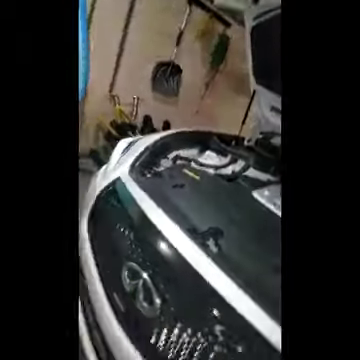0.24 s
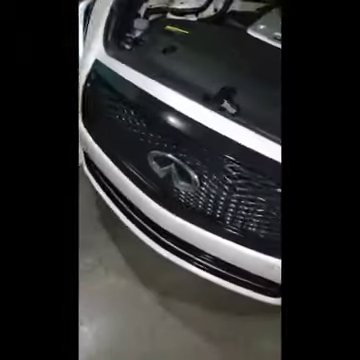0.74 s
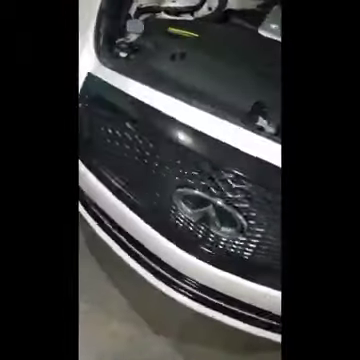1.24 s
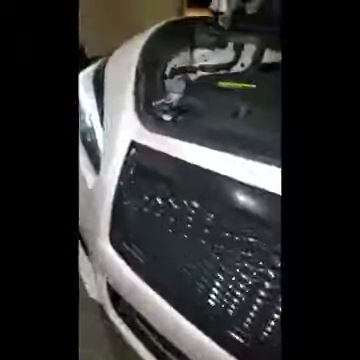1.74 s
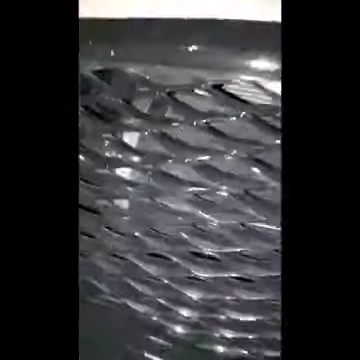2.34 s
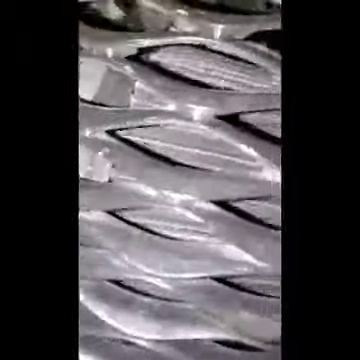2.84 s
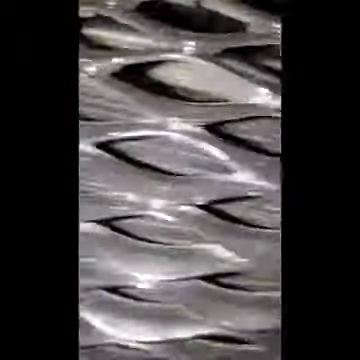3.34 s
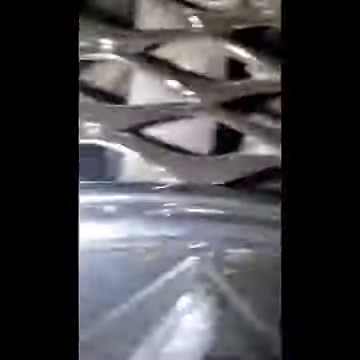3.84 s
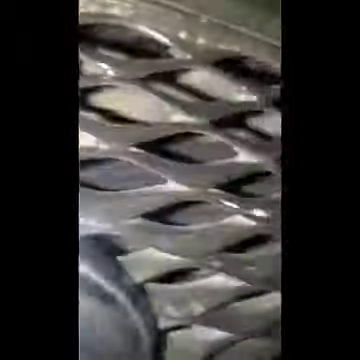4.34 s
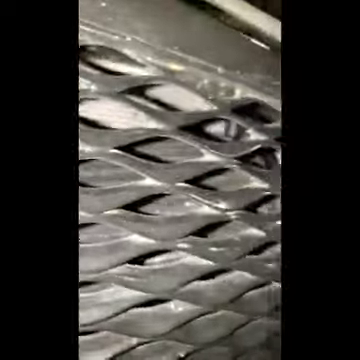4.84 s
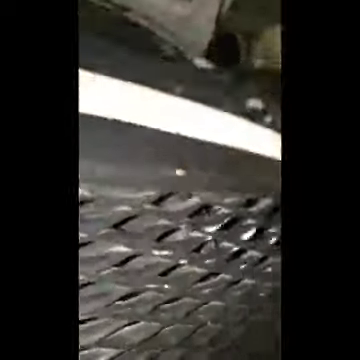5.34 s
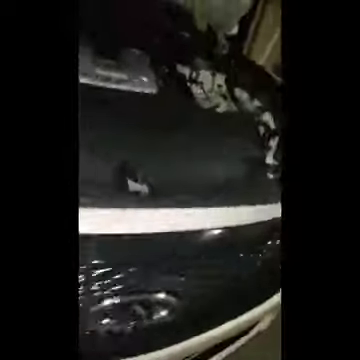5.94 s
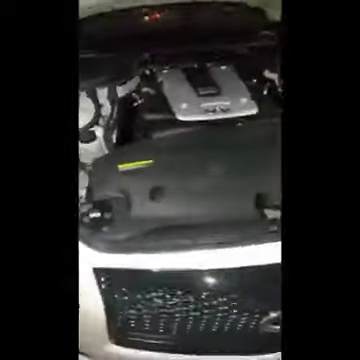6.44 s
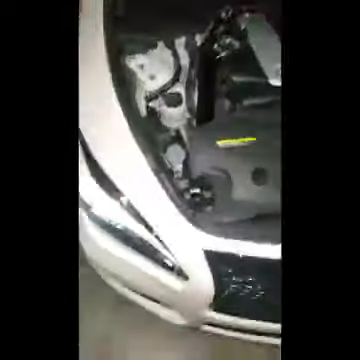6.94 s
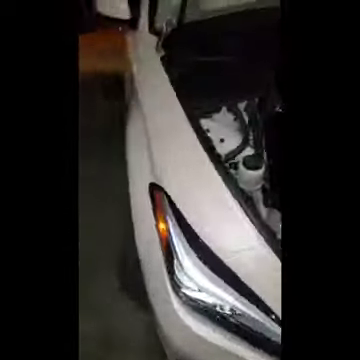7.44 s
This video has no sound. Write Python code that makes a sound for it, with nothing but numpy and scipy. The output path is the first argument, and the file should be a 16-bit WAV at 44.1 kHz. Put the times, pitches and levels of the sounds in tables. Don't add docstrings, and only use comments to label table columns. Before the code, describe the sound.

A six-cylinder engine idles fast in a closed garage for the whole 7.7 seconds, already running at the start and never revved. A deep boom around 100 hertz throbs between eight and nine times a second, beneath a broad roar of fan, belts and ticking valve gear. A high, thin alternator whine is clearest in the first second, then comes and goes. From about 1.2 to 2.4, low air thumps buffet the right side as the phone swings. A sleeve brushes around 1.8 to 2.1, and keys tinkle brightly at 2.1 to 2.3, with a tiny tick at 2.75. From 2 to 5.5, near the grille, the roar is brighter, with hollow ringing. At 5.85 to 6.05 keys clack harder with a soft cloth brush. The boom thins around 7, then swells back as the idle sags slightly.

```python
import sys
import numpy as np
from scipy import signal
from scipy.fft import rfft, irfft
from scipy.io import wavfile
from scipy.ndimage import uniform_filter1d

SR = 44100
rng = np.random.default_rng(int(sys.argv[2]) if len(sys.argv) > 2 else 0)


def attenuation_scalar(level_db):
    decades = np.asarray(level_db, float) / 20
    return 10 ** decades


def transcribe(u):
    v = np.clip(np.atleast_2d(u).T, -1, 1)
    q = np.round(v * 32767).astype(np.int16)
    wavfile.write(sys.argv[1], SR, q)


N = 339570
T = np.arange(N) / SR
FREQ = np.fft.rfftfreq(N, 1 / SR)


def columns(table):
    s, *values = np.transpose(table)
    return [np.interp(T, s, v) for v in values]


def at_hz(points, hz):
    f, v = np.transpose(points)
    return np.interp(np.log(np.maximum(hz, 1)), np.log(f), v)


def noise(gain, channels=2):
    white = rng.standard_normal((channels, N))
    return irfft(rfft(white) * gain * np.sqrt(SR / 2), N)


def walk(rate_hz):
    hold = int(SR / rate_hz)
    steps = np.repeat(rng.standard_normal(N // hold + 1), hold)[:N]
    return 1.54 * uniform_filter1d(uniform_filter1d(steps, hold), hold)


def ports(x, pan_db):
    return x * attenuation_scalar(np.array([pan_db / 2, -pan_db / 2]).reshape(2, -1))


def swells(rows, edge_db_per_s):
    gain = 0
    for start, end, db in rows:
        outside_s = np.clip(np.maximum(start - T, T - end), 0, None)
        gain = gain + attenuation_scalar(db - edge_db_per_s * outside_s)
    return gain


# t/s, rate/(cycles/s); a cycle is two crank turns, six firings
CYCLE_RATE = [(0.0, 8.678), (0.7, 8.577), (1.3, 8.694), (2.3, 8.683), (3.0, 8.619), (4.0, 8.624),
              (4.4, 8.538), (4.8, 8.6), (5.5, 8.698), (6.1, 8.617), (6.9, 8.575), (7.7, 8.312)]


def engine_cycles():
    return np.cumsum(columns(CYCLE_RATE)[0]) / SR


# t/s, order 12 level/dB, order 36 level/dB
BOOM = [(0.0, -20.5, -49), (0.35, -19.5, -52), (0.7, -22, -45), (1.3, -18.5, -43.5), (2.0, -20.7, -43),
        (2.4, -21.4, -41), (3.0, -19.6, -36), (3.7, -17, -43), (4.3, -17.4, -44.5), (4.8, -16.5, -51.5),
        (5.4, -16.6, -55), (5.75, -18, -42), (6.4, -25, -44.5), (7.03, -29.5, -38), (7.35, -27, -35.5),
        (7.7, -21.5, -42.5)]
# order, level/dB
WEAK_ORDERS = [(6, -35), (9, -51.5), (10, -53), (11, -43), (14, -45.5), (15, -47.5), (16, -88), (18, -42.0),
               (19, -71), (20, -60.5), (21, -53), (22, -49), (25, -45), (26, -45.5), (30, -49), (32, -54),
               (37, -51), (44, -51.5), (48, -56), (60, -58)]
THROB_LAG_TURNS = .41
IN_STEP = {6: THROB_LAG_TURNS, 14: THROB_LAG_TURNS, 22: 2 * THROB_LAG_TURNS, 26: 2 * THROB_LAG_TURNS, 9: .1,
           10: .1, 11: 0, 15: .15, 18: .3, 25: .15, 37: .9 + THROB_LAG_TURNS}
NULL_DB = -21.5
THIRTEEN_DB, THIRTEEN_LATE_S, THIRTEEN_SHARE = -30, 0.21, 1.3
DOUBLE_DB, DOUBLE_FADE_DB_PER_S, DOUBLE_SHARE = -35, -0.48, 0.43


def firings(turns):
    def order(k, db, lag, apart_db):
        tone = np.sqrt(2) * np.cos(2 * np.pi * (k * turns - lag))
        return ports(attenuation_scalar(db) * tone, apart_db * walk(1.43))

    twelve_db, triple_db = columns(BOOM)
    null_db = np.minimum(twelve_db - NULL_DB, 0)
    thirteen_db = THIRTEEN_DB + THIRTEEN_SHARE * np.interp(T - THIRTEEN_LATE_S, T, null_db)
    double_db = DOUBLE_DB + DOUBLE_FADE_DB_PER_S * T + DOUBLE_SHARE * null_db

    out = order(12, twelve_db, 0, .5)
    out += order(13, thirteen_db, THROB_LAG_TURNS, .7)
    out += order(24, double_db, .15, 1.5)
    out += order(36, triple_db + 1, .9, 3.0)

    near = twelve_db - twelve_db.mean()
    far = triple_db - triple_db.mean()
    neighbour_db = {10: near, 11: near, 35: far, 37: far}
    for k, db in WEAK_ORDERS:
        drift = min(k / 24, 1.5)
        lag = IN_STEP.get(k, rng.random()) + .04 * drift * walk(1.2)
        db = db + .7 * neighbour_db.get(k, 0) + 1.55 * drift * walk(1.45)
        out += order(round(k), db, lag, drift)
    return out


# t/s, grille level/dB, engine bay level/dB
ROAR = [(0.0, -44, -41), (0.4, -43.5, -41.5), (1.3, -42.5, -41.5), (1.55, -40.5, -46.5), (1.85, -39.5, -44),
        (2.1, -38, -42.5), (2.4, -38.5, -42.5), (2.85, -39, -41.5), (3.3, -38, -41), (3.7, -39, -41.5),
        (4.1, -40.5, -43.5), (4.3, -39, -43), (5.3, -38.5, -43.5), (5.8, -40, -44), (6.7, -41.5, -44.5),
        (7.1, -44.5, -42), (7.7, -42.5, -41.5)]
# f/Hz, density/(dB per Hz)
ROAR_COLOUR = [(25, -72), (60, -68), (100, -58), (150, -62.5), (300, -64), (600, -67), (900, -72.5),
               (1500, -75), (2600, -73), (4000, -78.5), (6500, -85), (7800, -93.5), (12500, -93),
               (15500, -95)]
# f/Hz, share/(0-1)
WIDTH = [(25, 0.55), (150, 0.21), (350, 0.37), (700, 0.73), (1400, 1.0), (15500, 0.98)]
BODY_PER_DB = 0.19
HISS_PER_DB, HISS_PER_BAY_DB = 0.63, 1.17
GRILLE_PAN_DB, GRILLE_PAN_PER_DB, BAY_PAN_DB = -2, -1.03, -1


def roar(turns):
    levels_db = columns(ROAR) + columns(BOOM)[1:]
    grille_db, bay_db, wave_db = (z - z.mean() for z in levels_db)
    body_db = BODY_PER_DB * wave_db
    hiss_db = HISS_PER_DB * grille_db + HISS_PER_BAY_DB * bay_db
    zones_db = np.array([body_db, bay_db, grille_db, hiss_db])
    bay_pan = BAY_PAN_DB + 1.2 * walk(3.07)
    grille_pan = GRILLE_PAN_DB + GRILLE_PAN_PER_DB * grille_db

    zone_hz = np.log([250, 1000, 2800, 5500, 9000])
    octave = np.log2(np.maximum(FREQ, 1) / 25)
    colour = attenuation_scalar(at_hz(ROAR_COLOUR, FREQ))
    swell, out = walk(2.82), 0
    for step in np.arange(0, 10, .5):
        hz = 25 * 2 ** step
        mid, side = noise(colour * np.cos(np.pi * np.clip(octave - step, -.5, .5)))
        share = [np.interp(np.log(hz), zone_hz, row) for row in np.eye(5)]
        db = np.dot(share[:4], zones_db) + 0.22 * share[4] * hiss_db
        db = db + 0.34 * swell + 0.45 * walk(8)
        wide = np.clip(at_hz(WIDTH, hz), 0, 1.2)
        both = (mid + wide * side * np.array([[1], [-1]])) * attenuation_scalar(db)
        pan = bay_pan * (share[0] + share[1])
        pan = pan + grille_pan * (share[2] + share[3] + 0.069 * share[4])
        out = out + ports(both, pan)
    return out * attenuation_scalar(.25 * np.cos(2 * np.pi * 12 * turns))


# left minus right level/dB, rows of f/Hz, width/Hz, level/dB, from t/s, to t/s
HOLLOWS = [
    (-5.5, [(1775, 320, -48, 0.087, 1.7), (2210, 78, -47, 2.3, 3.6), (2554, 93, -49.5, 2, 5.43), (2960, 72, -51, 2.7, 4.2), (3050, 250, -50, 2.2, 3.7), (4350, 120, -62, 2, 4.8), (1755, 110, -52, 4.2, 5.8), (1600, 290, -52, 6.34, 8)]),
    (-12, [(2420, 51, -51, 1.7, 4.8), (3100, 380, -53.5, 6.05, 7.26), (286, 39, -48, 6.53, 7.18)]),
    (-1.5, [(4170, 60, -60, 4.6, 5.2), (982, 3, -52.5, 3.2, 5.7), (524, 10, -49.5, 5, 6.45)]),
]


def hollows():
    out = 0
    for pan_db, rows in HOLLOWS:
        for hz, width_hz, db, start, end in rows:
            band = noise(np.exp(-((FREQ - hz) / width_hz) ** 2) / np.sqrt(width_hz))
            facing = np.clip(np.minimum(T - start, end - T) / 0.6 + .5, 0, 1)
            out = out + ports(band * facing * attenuation_scalar(db + 1.6 * walk(4.02)), pan_db)
    return out


# from t/s, to t/s, level/dB
WHINE = [(-.1, 1.0, -40.5), (1.25, 1.4, -43), (1.6, 1.7, -43.5), (2.1, 2.88, -44), (3.0, 3.4, -52),
         (3.5, 3.92, -43.5), (4.06, 4.1, -51), (4.64, 4.95, -50), (5.2, 5.5, -53), (5.72, 6.07, -46),
         (6.25, 6.45, -50), (7.1, 7.22, -47.5)]
WHINE_HIDDEN_DB, WHINE_EDGE_DB_PER_S = -56, 81


def whine(turns):
    slip = .2 * walk(3) + .06 * walk(14) + .04 * np.array([walk(2), walk(2)])
    tone = np.cos(2 * np.pi * (78.05 * turns + slip))
    waver_db = .7 * np.array([walk(2), walk(2)]) + 1.8 * walk(9) - 2.5
    gain = swells(WHINE, WHINE_EDGE_DB_PER_S) + attenuation_scalar(WHINE_HIDDEN_DB)
    return np.sqrt(2) * gain * attenuation_scalar(waver_db) * tone


# t/s, peak level/dB, f/Hz, length/cycles
LUMPS = [(1.195, -22, 75, 2.2), (1.265, -32, 65, 2.2), (1.37, -21, 65, 1.8), (1.4, -19, 85, 2),
         (1.445, -16, 80, 2.5), (1.49, -15, 75, 3.2), (1.538, -14.5, 131, 1.4), (1.59, -24, 60, 2.4),
         (1.646, -20, 90, 2.2), (1.68, -13.5, 129, 1.2), (1.753, -19, 70, 2.2), (1.826, -25, 110, 2.2),
         (1.875, -25, 70, 1.8), (1.929, -27, 80, 2), (1.962, -13.5, 121, 0.55), (1.99, -24, 65, 1.6),
         (2.029, -18, 90, 1.2), (2.066, -17, 108, 2.7), (2.145, -22, 140, 2.2), (2.18, -23, 75, 2.2),
         (2.247, -22, 170, 3), (2.3, -28, 80, 2.2), (2.36, -31, 90, 2.5), (5.6, -38, 65, 3.5),
         (6.9, -34, 55, 3.5), (7.5, -35, 50, 3.4)]
FLUTTER_DB, FLUTTER_S = -13, .04


def buffet():
    gain = (FREQ / 70) ** 2 / (1 + (FREQ / 80) ** 4) / 4.9
    gusts = sum(attenuation_scalar(db + FLUTTER_DB) * np.exp(-((T - s) / FLUTTER_S) ** 2) for s, db, *_ in LUMPS)
    out = noise(gain) * gusts * attenuation_scalar(np.array([[-8.0], [-4.0]]))
    t = T[:SR // 5] - .1
    for s, db, hz, cycles in LUMPS:
        envelope = attenuation_scalar(db) * np.exp(-(1.9 * t * hz / cycles) ** 2)
        lump = envelope * np.cos(2 * np.pi * (hz * t + rng.random()))
        i = int((s - .1) * SR)
        out[:, i:i + len(t)] += (lump - lump.mean()) * attenuation_scalar(np.array([[-18.0], [3.0]]))
    return out


# f/Hz, level/dB, t60/s
KEYS = [
    [(5690, -12, .04), (7200, -16, .05), (9630, -8, .06), (11280, -10, .04), (14000, 5, .08),
     (14210, -5, .07)],
    [(11660, -6, .04), (11960, 0, .045), (12840, -12, .04), (13700, -14, .04)],
    [(4700, -10, .03), (5900, -14, .03), (12870, 0, .1), (14430, -6, .07)],
    [(2500, -8, .02), (4100, 6, .015), (4620, 4, .035), (6840, -3, .035), (12820, -3, .035),
     (14450, -12, .06)],
]
KEY_PAN_DB = [-1, -6, -7, -8]
# t/s, key, ring level/dB, crack level/dB, crack f/Hz
STRIKES = [(2.113, 0, -37, -30, 8000), (2.122, 0, -35, -44, 9000), (2.1305, 0, -31, -38, 10000),
           (2.139, 0, -36, -36, 10500), (2.2615, 1, -37, -27, 12500), (2.266, 1, -32, -33, 12000),
           (2.757, 2, -56, -30, 4400), (5.851, 1, -45, -36, 9000), (5.887, 2, -54, -32, 6000),
           (5.8975, 2, -50, -29, 7000), (5.9025, 2, -54, -24, 2900), (5.9035, 2, -52, -15.5, 5200),
           (5.932, 2, -56, -32, 5500), (5.951, 2, -30, -26, 5200), (5.972, 2, -50, -40, 12000),
           (5.9825, 2, -46, -29, 5600), (6.0368, 3, -28, -13.5, 5500), (6.042, 3, -42, -25, 5000),
           (6.0465, 3, -44, -26, 4500)]


def keys():
    out, t = np.zeros((2, N + SR)), T[:SR // 4]
    for s, key, ring_db, crack_db, hz in STRIKES:
        key = int(round(key))
        ring = 0
        for f, db, t60_s in KEYS[key]:
            phase = 9 * rng.standard_normal((2, 1))
            mode = np.sin(2 * np.pi * f * t + phase) * 1000 ** (-t / t60_s)
            ring = ring + attenuation_scalar(db + rng.standard_normal()) * mode
        grit = rng.standard_normal(150) * np.exp(-np.arange(150) / 40)
        grit = np.pad(grit, (0, len(t) - 150))
        band = signal.butter(3, [hz * .55, min(hz * 1.28, 20000)], "bandpass", fs=SR)
        crack = signal.lfilter(*band, grit)
        crack /= np.abs(crack).max()
        strike = attenuation_scalar(ring_db) * ring + attenuation_scalar(crack_db) * crack
        i = int(s * SR)
        out[:, i:i + len(t)] += ports(strike, KEY_PAN_DB[key])
    return out[:, :N]


# from t/s, to t/s, level/dB
SLEEVE = [
    (1.74, 1.86, -55),
    (1.86, 1.93, -49),
    (1.95, 2.13, -42.5),
    (2.74, 2.76, -55),
    (5.84, 6.06, -52),
    (6.88, 6.89, -53),
]
# f/Hz, level/dB
SLEEVE_COLOUR = [(1500, -20), (3500, 1), (4500, 0), (5400, -14), (6300, -9), (8000, -22), (10500, -17),
                 (12500, -3), (15000, -7)]


def sleeve():
    swell = swells(SLEEVE, edge_db_per_s=250)
    hiss = noise(attenuation_scalar(at_hz(SLEEVE_COLOUR, FREQ)) / 31.0)
    grain = attenuation_scalar(1.5 * walk(40) + 1.8 * walk(300))
    return ports(hiss * swell * grain, 1.0)


def garage(x, t60_s=.2, wet_db=-12):
    t = T[:SR // 3]
    tail = rng.standard_normal((2, len(t))) * 1000 ** (-t / t60_s) * (t > .003)
    tail /= np.sqrt(np.sum(tail ** 2, axis=1, keepdims=True))
    return x + attenuation_scalar(wet_db) * signal.fftconvolve(x, tail, axes=1)[:, :N]


def scene():
    turns = engine_cycles()
    engine = firings(turns) + roar(turns) + hollows() + whine(turns)
    return engine + buffet() + garage(keys()) + sleeve()


# f/Hz, width/Hz, left level/dB, right level/dB
PORT_PEAKS = [(1840, 530, -0.5, 1.5), (2220, 480, -2.0, 0.5), (3250, 550, 2.5, 1.5), (4340, 200, -0.5, 2.5),
              (5150, 640, -3, -1), (6620, 580, 1, 3.5), (7360, 900, -13, -1), (8100, 500, 3.2, 3.2)]


def port_cavities(x):
    colour_db = 0
    for hz, width_hz, *sides_db in PORT_PEAKS:
        bell = np.exp(-((FREQ - hz) / (0.55 * width_hz)) ** 2)
        colour_db = colour_db + np.outer(sides_db, bell)
    return irfft(rfft(x) * attenuation_scalar(colour_db), N)


def top_cut(x):
    return signal.sosfilt(signal.butter(12, 15150, fs=SR, output="sos"), x)


def record(dry):
    mix = port_cavities(dry)
    return top_cut(mix)


dry = scene()
out = record(dry)
transcribe(out)
```